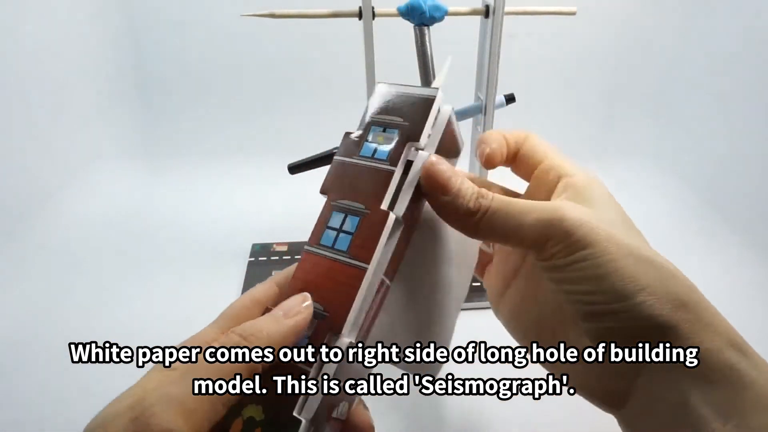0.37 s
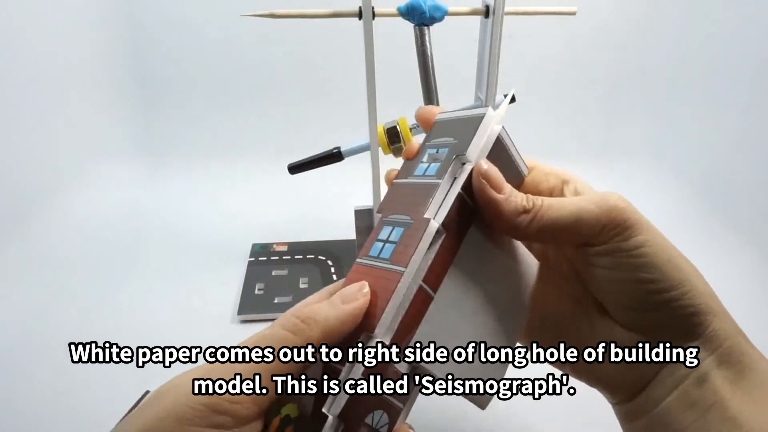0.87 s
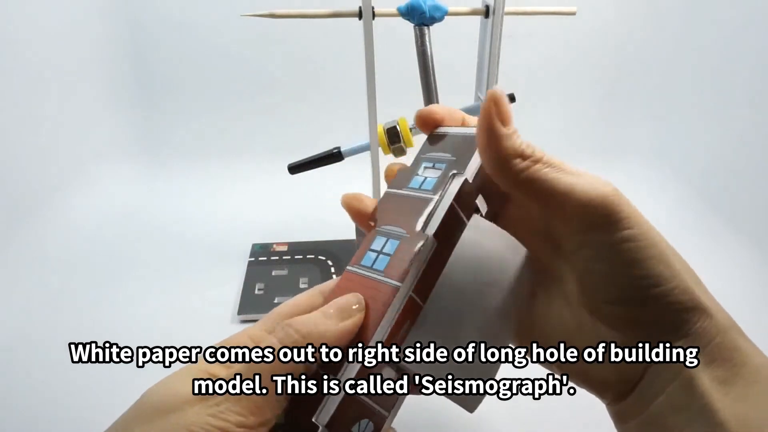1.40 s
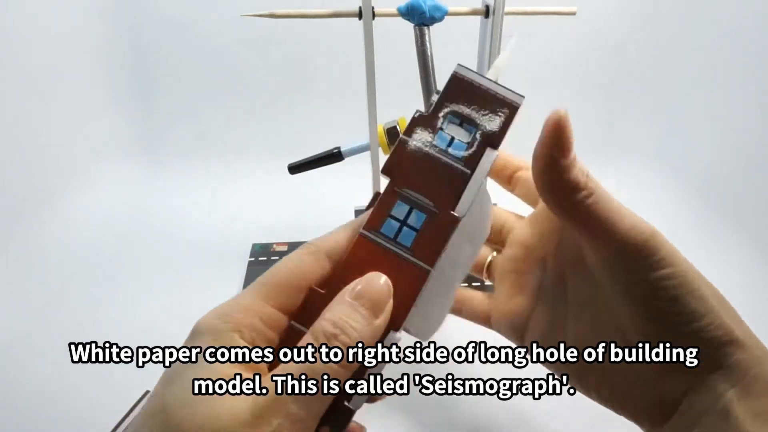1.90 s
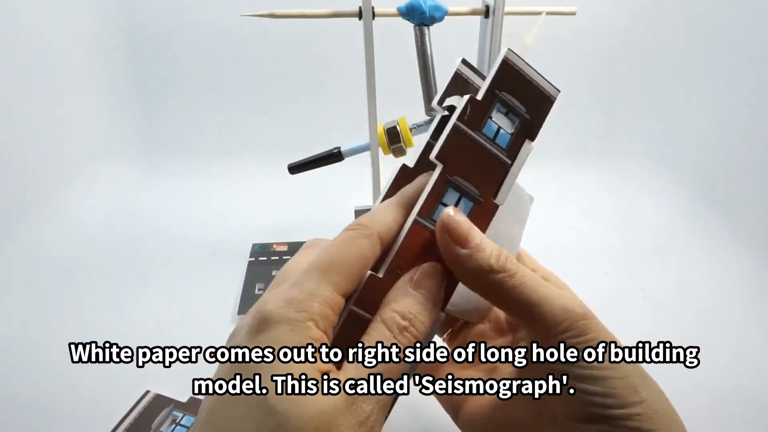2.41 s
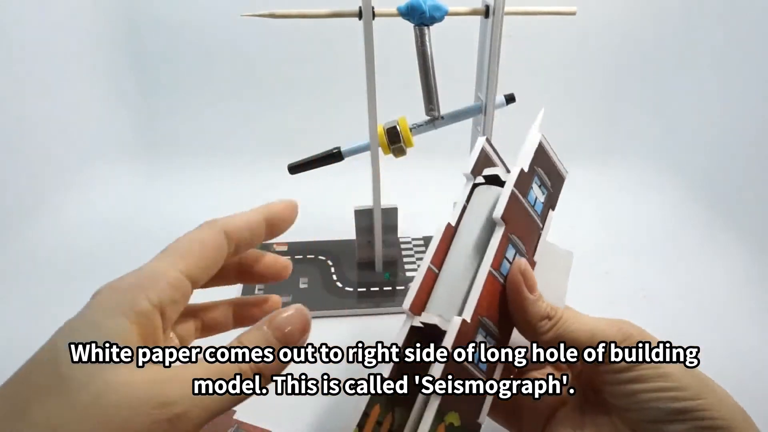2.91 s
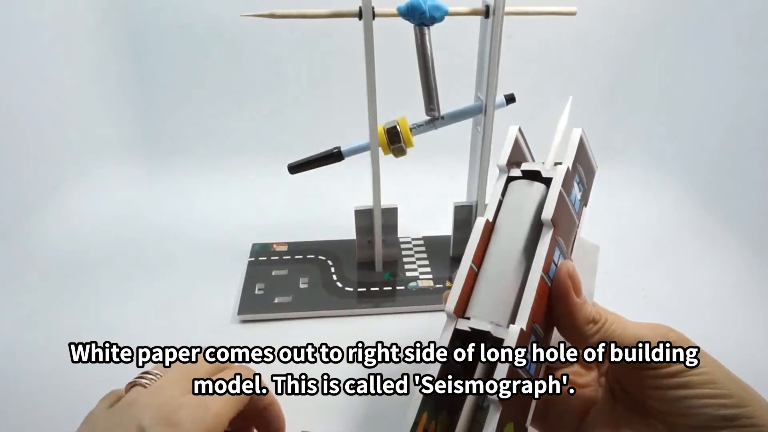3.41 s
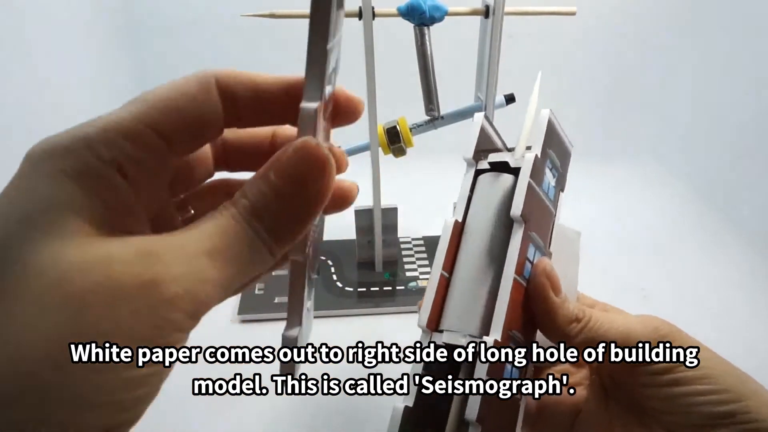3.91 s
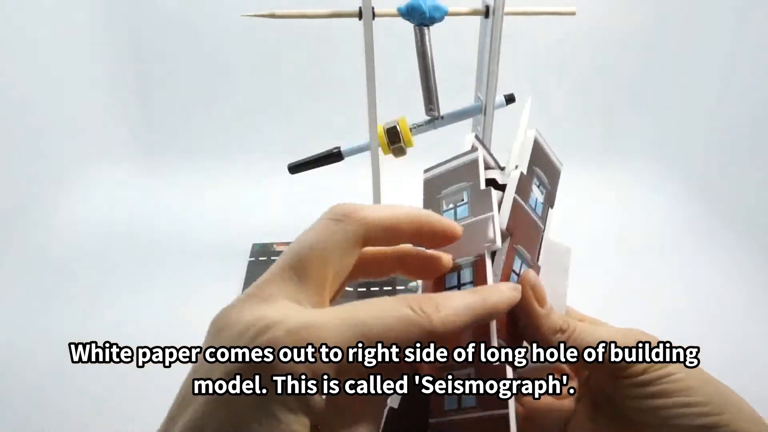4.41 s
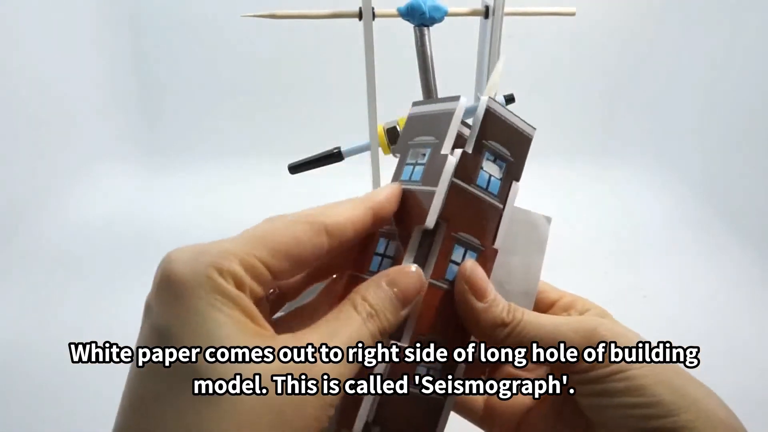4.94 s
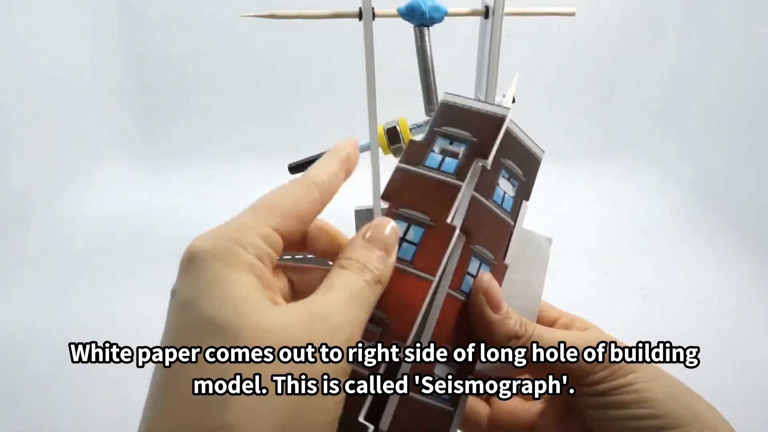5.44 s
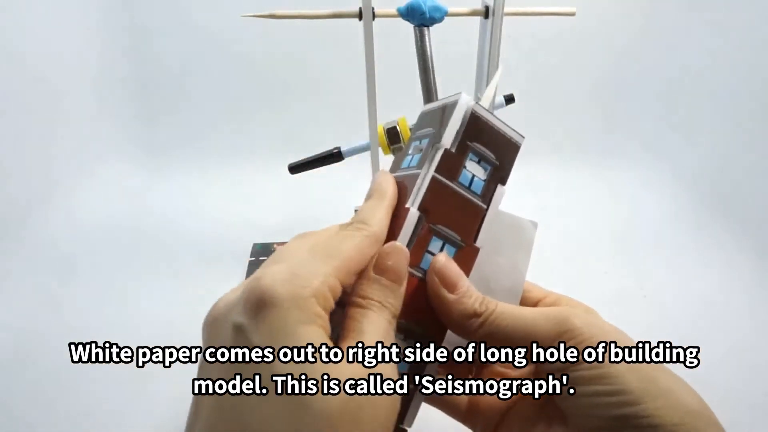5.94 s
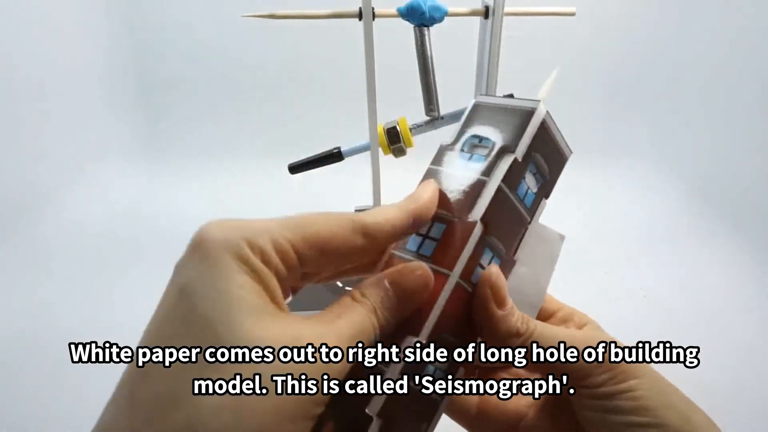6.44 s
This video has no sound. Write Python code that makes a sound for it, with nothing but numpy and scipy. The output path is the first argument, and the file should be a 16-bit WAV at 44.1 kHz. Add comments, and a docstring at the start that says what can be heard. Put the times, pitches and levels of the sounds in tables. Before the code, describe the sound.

Close stereo microphone in a small quiet room: fingers rub and press a hollow foam-board model. Faint rustles at first, then squeaky scrapes and brittle clicks, a paper strip stuttering in its slot, a loose panel dragging and knocking briefly on the table. After a sparser spell, pieces are fitted together with denser scrapes and crisp snaps. Faint hiss underneath.

```python
"""Hands rub and press a hollow foam-board model close to a small stereo microphone: grainy noise
drives resonances of skin, panels, box and palms. Tabs snap, each a short growing and dying train
of slips. A paper strip stutters in its slot; a loose panel drags and knocks on the table top.
A small quiet room answers with a dying noise tail, over faint shaped hiss."""
import sys
import numpy as np
from scipy import signal
from scipy.fft import rfft, irfft
from scipy.io import wavfile
from scipy.ndimage import uniform_filter1d

SR = 44100
rng = np.random.default_rng(int(sys.argv[2]) if len(sys.argv) > 2 else 0)


def volts(x):
    """Linear amplitude factor 10**(x/20) for a level x in dB, scalar or array-like."""
    e = np.asarray(x, float) / 20
    return 10 ** e


def master_out(mix):
    """Clip the mix to full scale and print it as 16-bit PCM to the path in sys.argv[1]."""
    frames = np.transpose(np.atleast_2d(mix))
    ceiling = np.clip(frames, -1, 1)
    pcm = np.round(ceiling * 32767).astype(np.int16)
    wavfile.write(sys.argv[1], SR, pcm)


N = 289719

# Room air and microphone noise. Each row: frequency in Hz, relative spectral level in dB.
HISS_SPECTRUM = [(30, -25), (150, -14.5), (300, -3), (600, -2.5), (1000, -0.5), (3000, -5.5), (6300, -5),
                 (10000, -11), (13000, -13), (16000, -15.5)]
# Grip on the model. Each row: time in seconds, centre of the freely ringing panel resonances in Hz,
# left minus right in dB.
GRIP = [(0.0, 2700, 0.5), (1.8, 3000, -1), (2.5, 3800, -2.5), (3.2, 2800, -1), (3.7, 2600, 0.5),
        (4.3, 3900, -1), (4.7, 3000, -1), (5.35, 4100, -0.5), (5.65, 3050, 0), (6.57, 2400, -2)]
# Loose panel pulled over the table. Each row: time in seconds, level in dB before a common trim.
DRAG_LEVELS = [(3.376, -48), (3.384, -35), (3.402, -49), (3.428, -28), (3.512, -32), (3.6, -52.5),
               (3.68, -63)]
# Loose panel knocking on the table. Each row: start in seconds, push strength in dB before a trim.
KNOCKS = [(3.381, -9.5), (3.417, -10.5), (3.429, -27), (3.574, -23.5)]
# Paper strip in its slot. Each row: time in seconds, level in dB before a common trim.
STRIP_LEVELS = [(2.7, -70), (2.758, -60), (2.77, -43), (2.878, -42), (2.944, -65), (3.03, -70), (3.12, -63)]
# Paper edge catching. Each row: start in seconds, push strength in dB before a trim.
CATCHES = [(2.7726, -34), (2.9274, -37), (2.9688, -36.5), (3.0038, -40), (3.0338, -35.5), (3.0535, -47)]
# Snaps of tabs, nails and edges. Each row: release in seconds, squeak, panel and box levels in dB,
# dying time in ms.
SNAPS = [(0.183, -53, -62, -66.5, 19), (0.268, -47, -55.5, -77, 9.5), (0.374, -52.5, -55, -62, 6.5),
         (0.788, -34.5, -38.5, -42, 4.8), (0.874, -47, -54, -74, 7.8), (1.088, -35, -41, -54, 7.7),
         (1.143, -40, -64, -65, 4.4), (1.274, -42, -55, -68, 3.8), (1.344, -42.5, -51, -70, 8.1),
         (1.407, -40, -63, -62, 3.8), (1.425, -23.5, -31, -44, 9.7), (1.509, -39, -47, -59, 6.8),
         (1.538, -31, -46.5, -59, 7.5), (1.579, -58, -41, -50.5, 6.1), (1.692, -64, -33, -46, 6.8),
         (1.719, -23, -16, -32.5, 3.8), (1.969, -29, -36.5, -51, 5.7), (2.009, -48, -37, -58, 6.8),
         (2.316, -43, -43.5, -53, 8.1), (2.482, -56, -53, -54, 17), (2.56, -44, -59, -66, 12),
         (2.684, -47, -44, -55, 5.8), (3.132, -58.5, -55.5, -82.5, 9.3), (3.973, -37, -54.5, -83, 22),
         (4.137, -44.5, -58, -72, 8.7), (4.35, -43.5, -52.5, -53, 4.1), (4.421, -27.5, -29.5, -28, 12),
         (4.662, -37, -37, -59, 18), (4.685, -40, -38.5, -39.5, 16), (4.749, -63, -53, -44, 6.4),
         (4.828, -10.5, -31.5, -37, 2.74), (5.15, -63, -53, -54, 5), (5.257, -40, -52, -62, 10),
         (5.411, -30.5, -42, -74, 5.6), (5.571, -31.5, -39, -48.5, 11.6), (5.624, -37, -47, -51, 3),
         (5.68, -21.5, -34.5, -40, 8.9), (5.757, -24, -27, -62, 4.1), (5.766, -21.5, -16, -20, 5.4),
         (5.911, -40.5, -47, -51, 7.5), (5.966, -26.5, -26, -40.5, 8.5), (6.036, -35.5, -36.5, -44.5, 3),
         (6.164, -37, -34, -35, 8.2), (6.173, -22.5, -23, -33.5, 7.4), (6.46, -56, -49.5, -59, 2.9),
         (6.499, -17, -22, -41.5, 3.5)]
# Strokes of skin and paper over the board. Each row: start in seconds, length in seconds,
# squeak, panel and box levels in dB.
STROKES = [(0.0, 0.077, -69, -73, -78), (0.268, .11, -67, -72, -90), (0.55, .05, -71.5, -73, -79),
           (0.657, 0.095, -59, -66, -72), (0.812, 0.032, -58.5, -59.5, -64), (0.87, 0.18, -62, -68, -71),
           (1.05, 0.071, -48.5, -52.5, -59.5), (1.16, 0.064, -54, -58.5, -70),
           (1.203, 0.073, -52, -56.5, -71), (1.346, .04, -56.5, -64, -73.5), (1.423, 0.27, -51, -56, -67.5),
           (1.743, 0.065, -55.5, -49.5, -65), (1.938, 0.098, -51.5, -50, -60),
           (2.488, 0.091, -53.5, -55.5, -67), (2.14, 0.24, -74.5, -75, -77), (2.35, .12, -70.5, -71, -77),
           (2.617, .04, -61, -59, -72.5), (2.704, 0.067, -48.5, -51, -60.5),
           (2.769, 0.066, -40.5, -42, -52.5), (2.909, 0.15, -62, -61, -68.5),
           (3.704, 0.013, -49, -57.5, -62), (3.77, 0.014, -51.5, -56.5, -63),
           (3.826, 0.006, -48.5, -53.5, -63.5), (3.897, 0.0072, -48.5, -60, -79),
           (3.971, 0.05, -47, -59, -84), (4.062, 0.023, -45, -57.5, -85), (4.143, 0.022, -50.5, -62.5, -78),
           (4.185, 0.064, -67, -75, -87), (4.408, 0.14, -48.5, -52, -53), (4.593, 0.27, -51.5, -51.5, -63),
           (4.849, 0.079, -48.5, -59, -76.5), (4.955, 0.029, -53.5, -57, -64),
           (5.015, 0.026, -63, -69, -77), (5.169, 0.061, -72, -76, -84), (5.257, 0.0083, -45, -53, -76),
           (5.353, 0.072, -44.5, -51, -67), (5.529, 0.14, -47.5, -58, -71), (5.63, 0.087, -47, -49, -76),
           (5.775, 0.095, -58.5, -45, -56.5), (5.934, .11, -49, -48.5, -64), (6.115, .11, -47, -49, -67),
           (6.248, 0.041, -58, -57.5, -64.5), (6.34, 0.07, -62, -64, -73.5),
           (6.531, .05, -48.5, -54.5, -66)]
# Levels added under the strokes: squeak, panel and box in dB.
RESTING_DB = (-78, -86, -89)
# Soft thuds of the palms. Each row: time in seconds, level in dB.
THUDS = [(0.8, -60), (1.424, -52), (1.59, -65), (1.7, -59.5), (2.039, -59.5), (2.5, -66.5), (2.688, -62),
         (2.82, -82), (3.7, -69), (4.423, -50), (4.83, -68), (4.98, -80), (5.26, -68), (5.579, -47.5),
         (5.68, -55), (5.765, -55), (6.19, -97)]
# Resonances of loose panel, slot, hollow box, panels, skin and palms. Each row: frequency in Hz,
# width in Hz, relative level in dB, share that differs left and right.
LOOSE_MODES = [(200, 29, -1.5, .03), (330, 110, -12, 0.16), (456, 56, -6.5, 0.081), (647, 71, -1, 0.091),
               (1013, 103, 4, 0.16), (1525, 250, -6.5, .3), (2380, 630, -8.5, 0.51),
               (4470, 2600, -17.5, 0.36), (9600, 4700, -27.5, .4)]
SLOT_MODES = [(1458, 40, -2, 0.27), (1694, 270, -11.5, 0.34)]
BOX_MODES = [(625, 230, -6.5, 0.17), (804, 183, 7, 0.6), (1230, 330, 7, 0.19), (1421, 150, 13, 0.15),
             (1652, 52, 3.5, 1)]
PANEL_MODES = [(1950, 200, -1, .55), (2300, 220, -1, .6), (2650, 240, 1, .6), (3050, 260, -1, .6),
               (3450, 280, -1, .6), (3950, 320, -3, .55), (4450, 340, -3, .5), (4950, 380, -4, .5),
               (5600, 600, -8, .4)]
SQUEAK_MODES = [(6870, 1500, -8.5, 0.34), (8020, 600, -5.5, .2), (9386, 950, -1.5, .2),
                (10520, 660, 0.5, 0.33), (10930, 610, -1, 0.38), (12160, 790, -5.5, .35),
                (12820, 980, -9, .3), (14480, 1400, -16.5, .3)]
PALM_MODES = [(90.1, 75, -17.5, 0.1), (202, 76, -15, .1), (314.5, 91, -5, 0.2), (468, 114, -4, 0.21)]


def rms1(x):
    """Scale to unit rms."""
    return x / np.sqrt(np.mean(x ** 2))


def curve(table):
    """Interpolate a table's columns to every sample."""
    time_s, *columns = np.transpose(table)
    return [np.interp(np.arange(N) / SR, time_s, column) for column in columns]


def during(table):
    """True between a table's first and last times."""
    time_s = np.arange(N) / SR
    return (time_s > table[0][0]) & (time_s < table[-1][0])


def grit(size, rough_db):
    """Dense tiny slips: noise whose samples have a long-tailed spread of sizes."""
    spread = volts(rough_db * rng.exponential(size=size))
    return rms1(rng.standard_normal(size) * spread)


def flicker(rate_hz, depth_db):
    """Uneven grip: random dB levels held for one period, then smoothed over one."""
    hold = int(SR / rate_hz)
    steps = np.repeat(rng.standard_normal(N // hold + 1), hold)
    return volts(depth_db * uniform_filter1d(steps, hold)[:N])


def slips():
    """The grip gives way at random: a sudden gain rise that dies exponentially."""
    slips_per_s, slip_db, slip_ms = 25, -3, 5
    chance, size = rng.random(N), rng.exponential(size=N)
    kicks = (chance < slips_per_s / SR) * size * volts(slip_db)
    keep = np.exp(-1000 / (slip_ms * SR))
    return 1 + signal.lfilter([1], [1, -keep], kicks)


def pushes(table, ms):
    """Short soft pushes u exp(-u), greatest ms after their onset."""
    total = 0
    for start_s, db in table:
        u = np.maximum(np.arange(N) / SR - start_s + 0.00117, 0) * 1000 / ms  # onset 1.17 ms early
        total = total + volts(db) * u * np.exp(-u)
    return total


def swells(start_s, length_s, levels_db, swell_db_per_s, fade_db_per_s):
    """Motions that swell, hold and fade at steady dB rates; their powers add."""
    s = np.arange(0, N + 64, 64)[:, None] / SR  # one point per 64 samples
    before_s = np.maximum(start_s - s, 0)
    after_s = np.maximum(s - start_s - length_s, 0)
    shape_db = -swell_db_per_s * before_s - fade_db_per_s * after_s
    power = volts(2 * shape_db) @ volts(2 * np.transpose(levels_db))
    return [np.interp(np.arange(N) / SR, s[:, 0], np.sqrt(p)) for p in power.T]


def panel_freedom(centre_hz):
    """Fingers damp the panel resonances far from the centre: 6 dB at one octave, growing as its square."""
    return [volts(-6 * np.log2(hz / centre_hz) ** 2) for hz, *_ in PANEL_MODES]


def ring(x, modes, weights, shift=1):
    """Drive resonances, neighbours in opposite phase; each leads in phase at one port."""
    mid, side, power = 0, 0, 0
    for k, ((hz, width_hz, db, share), weight) in enumerate(zip(modes, weights)):
        b, a = signal.iirpeak(hz * shift, hz / width_hz, fs=SR)
        tone = volts(db) * weight * signal.lfilter(b, a, x)
        mid = mid + (-1) ** k * tone
        side = side + (-1) ** (k // 2) * share * tone * SR / (2 * np.pi * hz)
        power += volts(2 * db) * width_hz * np.pi / SR
    lead = np.gradient(side)  # a quarter cycle ahead
    return np.array([mid + lead, mid - lead]) / np.sqrt(power)


def hiss():
    """Room air and microphone noise, partly shared by the ports."""
    level_db, side_gain = -69.5, 0.78
    hz, db = np.transpose(HISS_SPECTRUM)
    log_hz = np.log(np.fft.rfftfreq(N, 1 / SR) + 1)
    colour = volts(np.interp(log_hz, np.log(hz), db))
    mid, side = irfft(rfft(rng.standard_normal((2, N))) * colour, N)
    return volts(level_db) * rms1(mid + side_gain * side * np.array([[1], [-1]]))


def room(x):
    """A dense dying noise tail, independent at each port, duller as it goes."""
    level_db, t60_s, bright_s, gap_s, bass_hz = -12, 0.22, 0.029, 0.003, 296
    t = np.arange(SR // 3) / SR
    noise = rng.standard_normal((2, len(t)))
    dull = signal.lfilter([0.35], [1, -0.65], noise)
    bright = 0.5 * noise * np.exp(-t / bright_s)
    tail = (dull + bright) * volts(-60 * t / t60_s) * (t > gap_s)
    # the small soft room returns little bass
    tail = signal.lfilter(*signal.butter(2, bass_hz, "high", fs=SR), tail)
    tail = tail / np.sqrt(np.sum(tail ** 2) / 2)
    return volts(level_db) * signal.fftconvolve(x, tail, axes=1)[:, :N]


def drag():
    """The loose panel stutters over the table top and knocks on it; both excite its resonances."""
    level = volts(curve(DRAG_LEVELS)[0] - 4.5) * during(DRAG_LEVELS)
    stutter = grit(N, 1.73) * flicker(130, 2.0) * level
    knocks = volts(-7.5) * pushes(KNOCKS, ms=0.13)
    return ring(stutter + knocks, LOOSE_MODES, np.ones(len(LOOSE_MODES)))


def strip():
    """The paper edge sticks and slips, and the slot answers at its own pitches."""
    level = volts(curve(STRIP_LEVELS)[0] - 8.5) * during(STRIP_LEVELS)
    slide = grit(N, 3.8) * flicker(70, 1.2) * level
    catches = volts(6.5) * pushes(CATCHES, ms=0.29)
    return ring(slide + catches, SLOT_MODES, [1, 1])


def snaps():
    """A creep grows to the release, then a train of slips dies; each touch has its own colour."""
    rustle_db, rustle_s = -27.5, 0.12  # follows every snap
    out, centre_hz = np.zeros((2, N + SR)), curve(GRIP)[0]
    lead, length = SR // 50, SR // 8  # samples before and after the release
    t = np.arange(-lead, length) / SR
    for start_s, squeak_db, panel_db, box_db, ms in SNAPS:
        tau_s, i = max(ms, 1) / 1000, int(start_s * SR)
        creep = 0.6 * np.exp(np.minimum(t, 0) / (0.35 * tau_s))
        rustle = volts(rustle_db) * np.exp(-t / rustle_s) * (1 - t / t[-1])
        dying = np.exp(-t / tau_s) + rustle
        train = grit(len(t), 1.8) * np.where(t < 0, creep, dying)
        shift = 1 + 0.04 * rng.standard_normal()  # all resonances move together
        for modes, db in ((BOX_MODES, box_db), (PANEL_MODES, panel_db), (SQUEAK_MODES, squeak_db)):
            weights = volts(2.4 * rng.standard_normal(len(modes)))
            if modes is PANEL_MODES:
                weights = weights * panel_freedom(centre_hz[i])
            out[:, i - lead:i + length] += volts(db) * ring(train, modes, weights, shift)
    return out[:, :N]


def rubbing():
    """One grainy contact drives skin, panels, box and palms; uneven grip makes each resonance flicker."""
    start_s, length_s, *levels_db = np.transpose(STROKES)
    strokes = swells(start_s, length_s, levels_db, swell_db_per_s=698, fade_db_per_s=295.5)
    squeak, panel, box = (level + volts(db) for level, db in zip(strokes, RESTING_DB))
    thud_s, *thud_db = np.transpose(THUDS)
    thud = swells(thud_s, 0, thud_db, swell_db_per_s=1492, fade_db_per_s=496.5)[0]
    palm = thud + volts(-14.5) * box  # palms also follow the box
    contact = grit(N, 2.1) * flicker(80, 2.4) * slips()
    out = 0
    for modes, level in ((SQUEAK_MODES, squeak), (PANEL_MODES, panel), (BOX_MODES, box), (PALM_MODES, palm)):
        weights = np.array([flicker(16, 2.6) for _ in modes])
        if modes is PANEL_MODES:
            weights = weights * panel_freedom(curve(GRIP)[0])
        out = out + ring(contact * level, modes, weights)
    return out


def scene():
    """Sum the near sounds, shift them slightly left and right, add room and hiss."""
    pan_db = curve(GRIP)[1]
    near = rubbing() + snaps() + strip() + drag()
    near = near * volts(np.array([pan_db, -pan_db]) / 2)
    return near + room(near) + hiss()


def roll_off(x):
    """The treble ends steeply here."""
    return signal.sosfilt(signal.butter(12, 16460, fs=SR, output="sos"), x)


def record(dry):
    """The microphone drops the deep bass: first-order high-pass at 120 Hz."""
    bass_cut = signal.butter(1, 120, "high", fs=SR, output="sos")
    mix = signal.sosfilt(bass_cut, dry)
    return roll_off(mix)


dry = scene()
out = record(dry)
master_out(out)
```